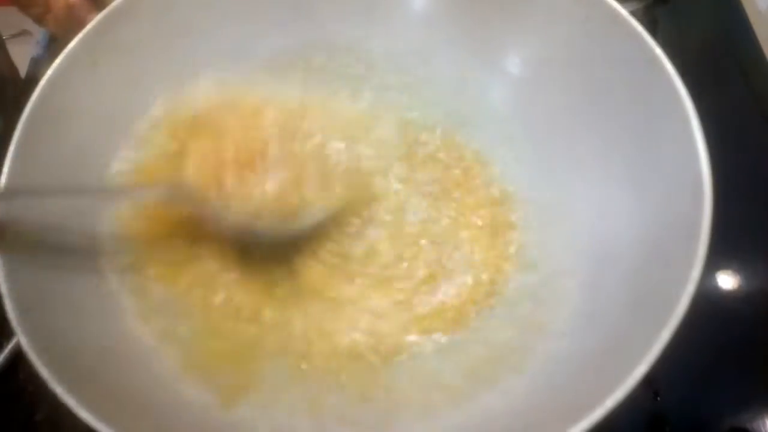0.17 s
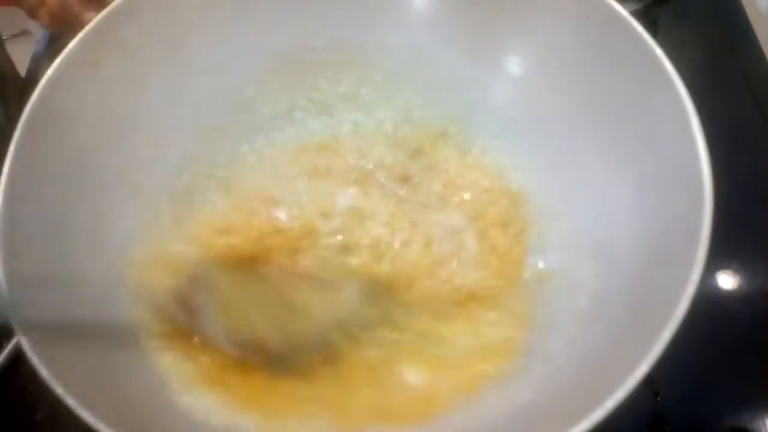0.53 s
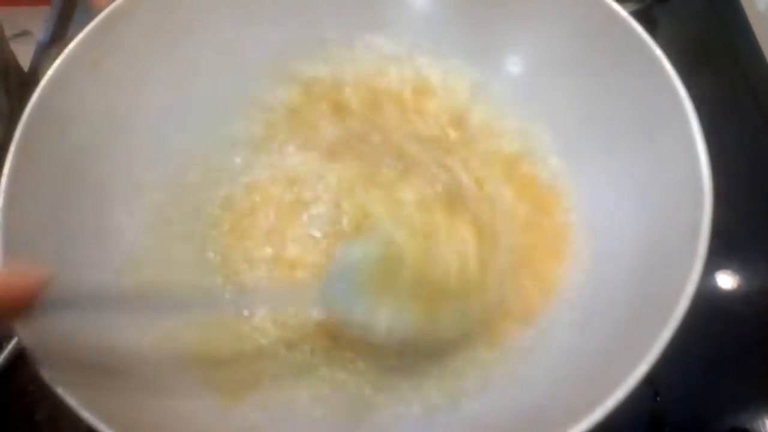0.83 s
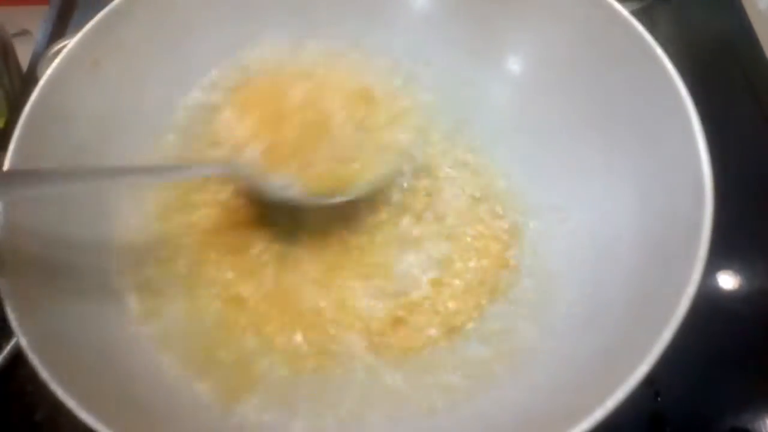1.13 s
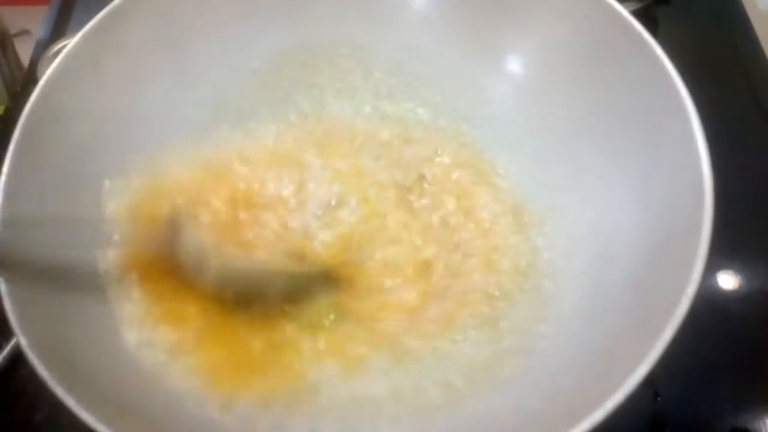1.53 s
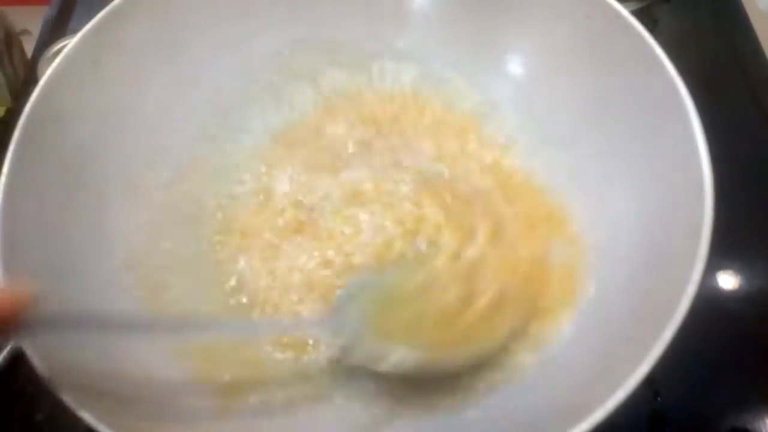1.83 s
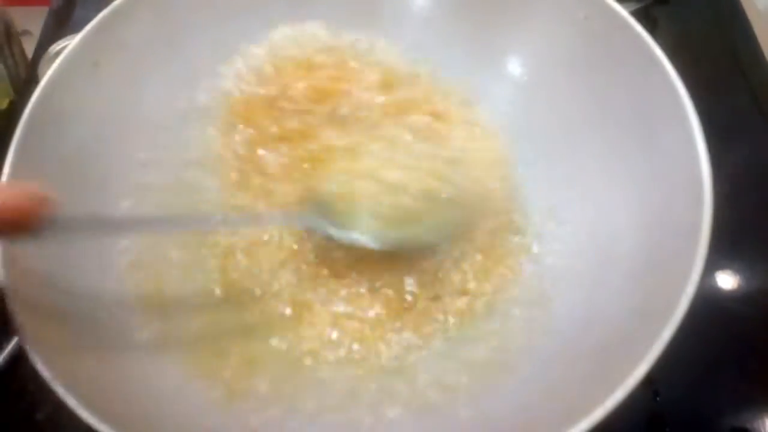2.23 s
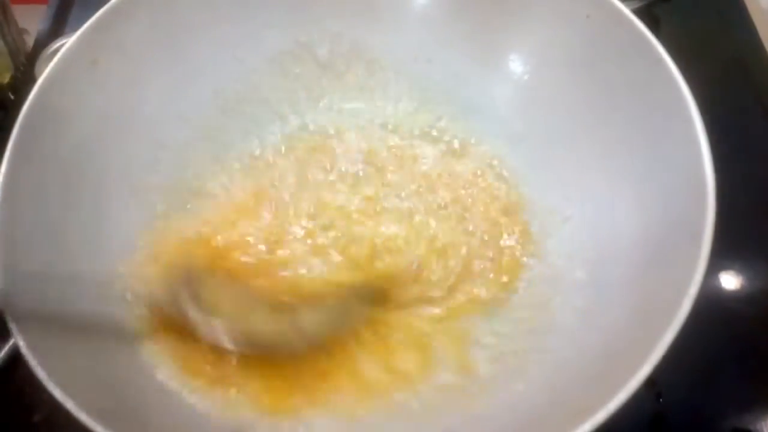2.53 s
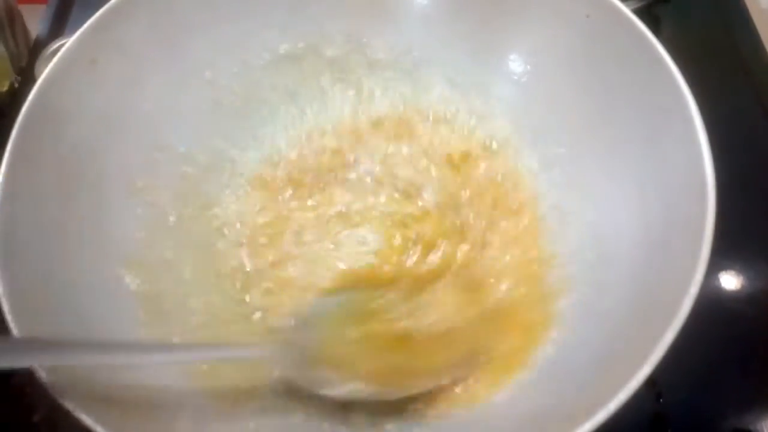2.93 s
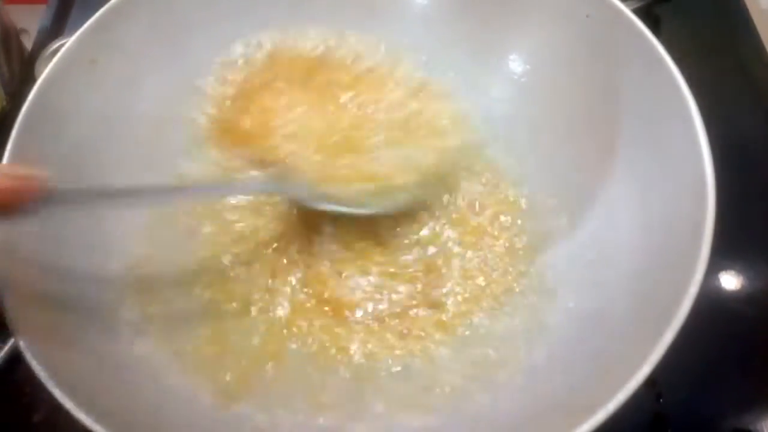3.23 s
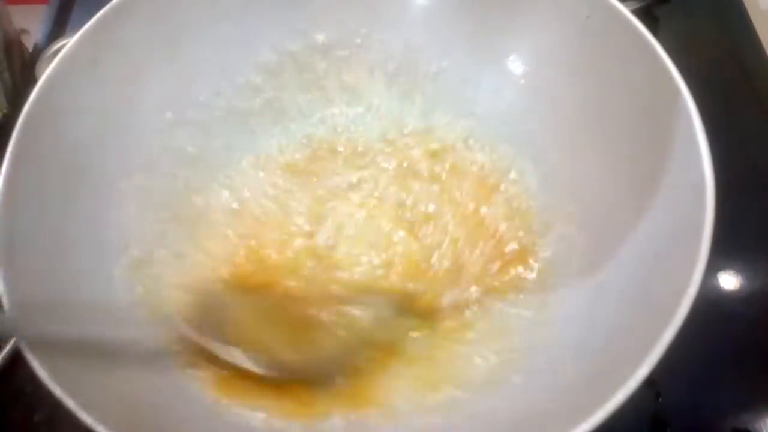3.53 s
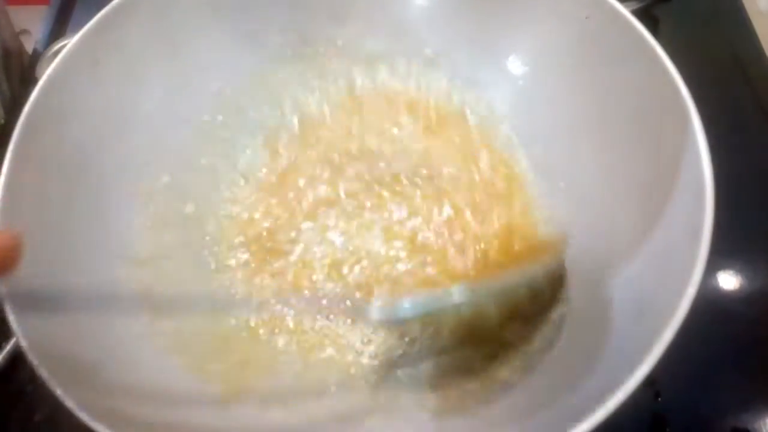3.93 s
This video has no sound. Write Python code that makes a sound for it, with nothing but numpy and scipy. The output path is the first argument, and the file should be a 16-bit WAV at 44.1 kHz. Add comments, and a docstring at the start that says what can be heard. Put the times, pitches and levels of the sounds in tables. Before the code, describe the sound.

Close up in a small kitchen, hot caramel and melted butter bubble and hiss in a wok. A metal spatula stirs steadily, roughly two strokes a second, with ringing scrapes, light knocks and a faint low rumble as the pan rocks on the stove. From about the middle, the blade gives a few short squeals, while the sizzle gradually eases and separate bubbles snap more often.

```python
"""Butter sizzles in hot caramel in a wok, close up in a small kitchen. Its water boils out as a froth
of bursting bubbles, which slowly dies down to single crackles. A metal spatula circles about twice
a second: stick-slip on the sugared bowl rings the wok and the blade, and each push grinds, knocks
and sets the wok rumbling on the stove."""
import sys
import numpy as np
from scipy import signal
from scipy.fft import rfft, irfft, next_fast_len
from scipy.io import wavfile
from scipy.ndimage import uniform_filter1d, map_coordinates

SR = 44100
rng = np.random.default_rng(int(sys.argv[2]) if len(sys.argv) > 2 else 0)


def to_wav(s):
    """Save 16-bit WAV."""
    ch = np.atleast_2d(s).T  # columns
    pcm = np.round(np.clip(ch, -1, 1) * 32767)  # PCM
    wavfile.write(sys.argv[1], SR, pcm.astype(np.int16))


N = 180413
T = np.arange(N) / SR
TOP_HZ = 15500


def undb(db):
    """Decibels to gain."""
    return 10 ** (np.asarray(db) / 20)


def unit(x):
    """Scale to rms 1."""
    return x / np.sqrt(np.mean(x ** 2))


def colour(x, points):
    """Minimum-phase filter through (Hz, dB) points."""
    hz, db = np.transpose(points)
    size = next_fast_len(2 * N, real=True)
    bins_hz = np.maximum(np.fft.rfftfreq(size, 1 / SR), 1)
    gain = undb(np.interp(np.log(bins_hz), np.log(hz), db))
    cepstrum = irfft(np.log(gain), size)
    cepstrum[1:size // 2] *= 2
    cepstrum[size // 2 + 1:] = 0
    return irfft(rfft(x, size) * np.exp(rfft(cepstrum)), size)[:N]


def ring(x, modes):
    """Sum of (Hz, width Hz, dB) resonances, alternating in sign."""
    return sum((-1) ** k * undb(db) * signal.lfilter(*signal.iirpeak(hz, hz / width_hz, fs=SR), x)
               for k, (hz, width_hz, db) in enumerate(modes))


def wander(rate_hz):
    """Smooth random curve, rms 1."""
    steps = rng.standard_normal(N // 100)
    return unit(map_coordinates(steps, [T * rate_hz], order=3, mode="wrap"))


def clicks(per_s, spread_db):
    """Random impulses, mostly small, a few large."""
    happens = rng.random(N) < per_s / SR
    size = undb(spread_db * np.minimum(rng.standard_exponential(N), 4.7))
    return happens * size * rng.choice([-1, 1], N)


def bump(centre_s, width_s):
    """Bell curve of height 1."""
    return np.exp(-((T - centre_s) / width_s) ** 2)


def press(start_s, length_s, rise_share):
    """Rounded rise and fall of pressure in one contact."""
    corners_s = [start_s, start_s + length_s * rise_share, start_s + length_s]
    return np.sin(np.pi / 2 * np.interp(T, corners_s, [0, 1, 0]))


def shove(peak_s, swell_s, t60_s):
    """Force that builds to a peak, then dies away."""
    return np.exp(np.minimum(T - peak_s, 0) / swell_s) * undb(-60 * np.maximum(T - peak_s, 0) / t60_s)


def rubbed(x, window_s=0.04):
    """Friction feeds a ring as fast as it fades, so its strength stays nearly even."""
    x = unit(x)
    power = uniform_filter1d(x ** 2, int(window_s * SR))
    return unit(x / np.sqrt(power + 0.18))


def burst(hz, rise_s):
    """One bubble bursts: a tone that swells and dies within milliseconds."""
    t = T[:SR // 100]
    age = t / rise_s
    return age ** 2 * np.exp(2 * (1 - age)) * np.sin(2 * np.pi * hz * t)


def bubbles(per_s, spread_db, rise_s, bounce_db=-8, bounce_s=.0025, pitch_count=48):
    """Bursts of all sizes and pitches; each bounces off the bowl with its own delay."""
    pulses = clicks(per_s, spread_db)
    pitch_index = rng.integers(0, pitch_count, N)
    pitches_hz = np.linspace(0, TOP_HZ, pitch_count + 1)[1:]
    direct = np.flatnonzero(pulses)
    delay = (SR * bounce_s * rng.uniform(.4, 2, N)[direct]).astype(int)
    bounced = np.minimum(direct + delay, N - 1)
    pulses[bounced] += undb(bounce_db) * pulses[direct]
    pitch_index[bounced] = pitch_index[direct]
    return sum(signal.oaconvolve(pulses * (pitch_index == k), burst(hz, rise_s))[:N]
               for k, hz in enumerate(pitches_hz))


def boil_db(crest_db, fall_db, power, crest_s=0.57, fall_s=3.33):
    """The boil crests, then fades ever faster as its water runs out."""
    return crest_db - fall_db * (np.abs(T - crest_s) / fall_s) ** power


# Spectra of the two bubble families. Each row: frequency in Hz, gain in dB.
FROTH_SPECTRUM = [(80, -49), (330, -26), (440, -9), (550, -13), (650, -1), (880, -1), (1170, -6),
                  (1550, 2.5), (2200, 1.5), (3600, 2.5), (5000, 4), (7000, -4), (9000, -30), (13000, -43)]
CRACKLE_SPECTRUM = [(1500, -34.5), (3000, -8), (4300, -5.5), (5500, 1.5), (6300, -1.5), (6800, -6),
                    (7400, -18.5), (8100, -27), (10000, -31.5), (11800, -42.5), (13800, -40),
                    (14800, -38.5), (15500, -22)]
# Brief sags in the sizzle. Each row: centre in seconds, gain in dB.
LULLS = [(.375, -3), (1.395, -0.5), (3.9, -3)]


def sizzle():
    """Water boils out of the butter in flurries: a dense froth and a brighter, thinning crackle."""
    # Each push spreads wet caramel on hot metal, reviving the drying froth and smothering the crackle.
    stirred = sum(bump(peak_s, width_s=0.16) for peak_s, *_ in PUSHES)
    froth_db = boil_db(crest_db=-22.5, fall_db=13.2, power=1.31) + 2.5 * stirred * T / T[-1]
    crackle_db = boil_db(crest_db=-23, fall_db=7.1, power=2.97) - 1.44 * stirred
    lull_db = sum(db * bump(centre_s, width_s=.045) for centre_s, db in LULLS)
    flurry = undb(wander(rate_hz=55))
    froth = bubbles(per_s=np.linspace(11000, 5000, N) * flurry, spread_db=2, rise_s=.00014)
    crackle = bubbles(per_s=np.linspace(11000, 3500, N) * flurry, spread_db=3, rise_s=.00022)
    out = 0
    for swarm, spectrum, db in ((froth, FROTH_SPECTRUM, froth_db),
                                (crackle, CRACKLE_SPECTRUM, crackle_db)):
        swarm = colour(swarm, spectrum)
        running_rms = np.sqrt(uniform_filter1d(swarm ** 2, SR // 3))
        out = out + swarm / running_rms * undb(db + lull_db)
    return out


# Spectrum of the room's background. Each row: frequency in Hz, gain in dB.
BACKGROUND_SPECTRUM = [(25, -7), (40, -15), (50, -5), (64, -11), (90, 5), (300, 5), (1000, -10),
                       (8000, -38)]


def background(level_db=-75.5):
    """Faint, steady low noise of the room."""
    return undb(level_db) * unit(colour(rng.standard_normal(N), BACKGROUND_SPECTRUM))


# The largest bubbles. Each row: start in seconds, level in dB, pitch in Hz.
POPS = [(0.173, -10.5, 3380), (1.0196, -4.5, 3820), (1.862, -8, 5140), (1.9813, -5.5, 4360),
        (1.991, -6, 5840), (2.7567, -10, 4120), (2.818, -8, 5740), (3.0096, -11, 5730), (3.1007, -9, 5590),
        (3.1483, -6, 4900), (3.347, -11, 4800), (3.5688, -8.5, 6400), (3.5846, -10, 6140), (3.67, -5, 5700),
        (3.7778, -9.5, 5660), (3.8613, -15, 4300), (3.9686, -8, 5900), (4.008, -10.5, 5670)]


def pops(spatter_per_s=40, spatter_db=-37.5):
    """Single large bubbles snap above the swarm, with smaller ones spattering at random."""
    large = np.zeros(N)
    for start_s, db, hz in POPS:
        snap = burst(hz, rise_s=.00036)
        at = int(start_s * SR)
        large[at:at + len(snap)] += undb(db) * snap[:N - at]
    pitches_hz = np.linspace(4400, 6400, 12)
    spatter = 0
    for hz in pitches_hz:
        pulses = clicks(spatter_per_s / len(pitches_hz), spread_db=6)
        spatter = spatter + signal.oaconvolve(pulses, burst(hz, rise_s=.00064))[:N]
    lowpass = signal.butter(4, 7200, fs=SR, output="sos")
    return signal.sosfilt(lowpass, large + undb(spatter_db) * unit(spatter))


# Catches of the spatula. Each row: start in seconds, length in seconds, level in dB.
SCRAPES = [(0.227, 0.14, -37), (0.717, 0.047, -33), (1.153, 0.25, -38.5), (1.333, .06, -32.5),
           (1.654, .066, -31), (1.765, 0.059, -32), (2.2, 0.079, -38), (2.684, 0.14, -30.5),
           (3.212, 0.16, -31.5), (3.367, 0.13, -36.5), (3.715, 0.09, -32.5)]


def scrape_pressure():
    """The spatula's edge catches on the bowl and lets go."""
    return sum(undb(db) * press(start_s, length_s, rise_share=0.17) for start_s, length_s, db in SCRAPES)


# Resonances of the wok. Each row: frequency in Hz, width in Hz, gain in dB.
WOK_MODES = [(429, 16, -11), (599, 44.5, -1), (681, 75, -5.5), (814, 81, -10), (984, 150, -15),
             (1300, 65, -19.5), (1530, 85, -16)]
# Spectrum of steel rasping on sugar. Each row: frequency in Hz, gain in dB.
RASP_SPECTRUM = [(600, -32), (1100, -9), (2000, 1), (2900, 3), (4400, 2), (5600, -14), (8000, -45)]


def bowl_scrape(rasp_end_db=-2.5, drag_vs_rumble_db=-1):
    """Stick-slip rings the wok; a bright rasp grows as the caramel dries."""
    # After each push the blade drags on lightly.
    drag = sum(undb(rumble_db + drag_vs_rumble_db) * press(peak_s, length_s=.17, rise_share=0.29)
               for peak_s, _, rumble_db, *_ in PUSHES)
    bandpass = signal.butter(3, [400, 2400], "band", fs=SR, output="sos")
    bowl = ring(clicks(per_s=530, spread_db=3.5), WOK_MODES)
    bowl = rubbed(signal.sosfilt(bandpass, bowl))
    rasp = unit(colour(clicks(per_s=2500, spread_db=1), RASP_SPECTRUM))
    rasp_gain = undb(rasp_end_db) * T / T[-1]
    return (bowl + rasp_gain * rasp) * (scrape_pressure() + drag)


# Spectrum of the rumble. Each row: ratio to the centre frequency, gain in dB.
JUDDER_SPECTRUM = [(.15, -16), (.4, -32), (.7, -5.5), (1, 2), (1.5, -2.5), (2.5, -5), (4, -28), (10, -53)]


def judder(centre_hz):
    """The wok shakes on the stove: low noise at rms 1."""
    spectrum = [(centre_hz * ratio, db) for ratio, db in JUDDER_SPECTRUM]
    return unit(colour(rng.standard_normal(N), spectrum))


# One spatula push per circle. Each row: peak in seconds, swell in seconds, rumble level in dB,
# rumble centre in Hz, thud level in dB, grind level in dB.
PUSHES = [(.405, 0.089, -48.5, 225, -51, -29), (.778, 0.013, -47.5, 195, -50.5, -32),
          (1.166, 0.013, -47, 194, -55.5, -39), (1.795, 0.024, -39.5, 225, -55, -35),
          (2.372, 0.05, -42.5, 225, -57, -23.5), (2.82, 0.026, -42, 247, -72, -38),
          (3.313, 0.018, -45, 267, -51.5, -33.5), (3.8, 0.031, -49.5, 253, -64, -44)]
# Spectrum of a knock. Each row: frequency in Hz, gain in dB.
KNOCK_SPECTRUM = [(40, -46), (150, -21), (450, -9), (800, 0), (1250, 1), (2000, -1), (3700, -12.5),
                  (6000, -29), (9000, -71)]


def grind():
    """Hard pushes grind steel on the bowl in a dense run of knocks."""
    force = sum(undb(db) * shove(peak_s, swell_s, t60_s=0.26) for peak_s, swell_s, *_, db in PUSHES)
    return force * unit(colour(clicks(per_s=1900, spread_db=1), KNOCK_SPECTRUM))


# Resonances of the stove. Each row: frequency in Hz, width in Hz, gain in dB.
STOVE_MODES = [(98.5, 13, -19), (114, 6.3, -4.5), (179.4, 12, -8), (272, 41, -3), (319, 8.5, 7.5),
               (446, 18, 0)]


def stove_rumble(shake_vs_scrape_db=-21.5, hum_vs_rumble_db=-10, settle_s=0.026):
    """Scrapes shake the stove; pushes rock the wok: a rumble, a thud as it settles, a longer hum."""
    rumble = undb(shake_vs_scrape_db) * scrape_pressure() * judder(centre_hz=250)
    thud_gain, hum_gain = np.zeros((2, N))
    for peak_s, swell_s, rumble_db, centre_hz, thud_db, _ in PUSHES:
        rumble += judder(centre_hz) * undb(rumble_db) * shove(peak_s, swell_s, t60_s=0.38)
        thud_gain += undb(thud_db) * shove(peak_s + settle_s, swell_s=0.021, t60_s=0.64)
        hum_gain += undb(rumble_db + hum_vs_rumble_db) * shove(peak_s, swell_s, t60_s=0.63)
    thud = thud_gain * judder(centre_hz=110)
    hum = hum_gain * unit(ring(rng.standard_normal(N), STOVE_MODES))
    return rumble + thud + hum


# Bites of the blade. Each row: start in seconds, length in seconds, level in dB, pitch in Hz.
SQUEALS = [(1.805, 0.12, -37.5, 1504), (2.29, 0.17, -29.5, 1678), (2.815, .15, -37, 1515),
           (3.363, 0.11, -35.5, 1555)]
# Resonances of the blade. Each row: ratio to the pitch, width in Hz, gain in dB.
BLADE_MODES = [(1, 62, 0), (2.21, 70, -4), (2.46, 70, -27)]


def blade_squeal():
    """The edge bites and sings: slips lock to the blade's ring, narrowing each resonance to a tone."""
    slips = clicks(per_s=1500, spread_db=1.5)
    out = np.zeros(N)
    for start_s, length_s, db, hz in SQUEALS:
        pressure = undb(db) * press(start_s, length_s, rise_share=0.43)
        for ratio, width_hz, mode_db in BLADE_MODES:
            mode = [(hz * ratio, width_hz, 0)]
            tone = rubbed(ring(ring(slips, mode), mode))
            out += pressure * undb(mode_db) * tone
    return out


def kitchen_reverb(x, wet_db=-11, t60_s=.38, predelay_s=.006):
    """Add the short, diffuse tail of a small room."""
    t = T[:SR // 2]
    tail = rng.standard_normal(len(t)) * undb(-60 * t / t60_s) * (t > predelay_s)
    return x + undb(wet_db) * signal.fftconvolve(x, tail / np.linalg.norm(tail))[:N]


def scene():
    """Boil and spatula in the room, over the stove's rumble and a faint background; mono."""
    room_noise = background()
    boil = sizzle() + pops()
    scrape = bowl_scrape()
    chatter = undb(wander(rate_hz=70))
    spatula = (scrape + blade_squeal()) * chatter + grind()
    return (kitchen_reverb(boil + spatula) + stove_rumble() + room_noise)[None]


def record(dry):
    """The microphone rounds the loudest peaks and cuts the very top."""
    rounded = np.tanh(.55 * dry) / .55
    lowpass = signal.ellip(10, .2, 80, TOP_HZ, fs=SR, output="sos")
    return signal.sosfilt(lowpass, rounded)


dry = scene()
out = record(dry)
to_wav(out)
```